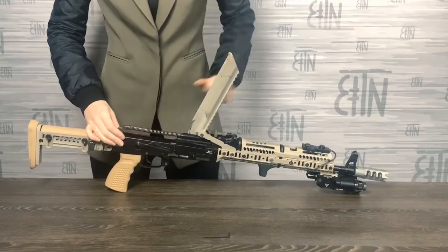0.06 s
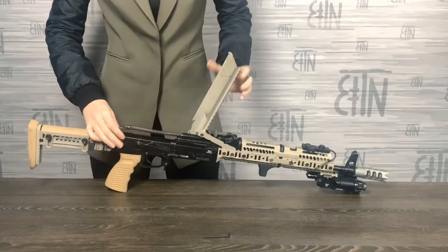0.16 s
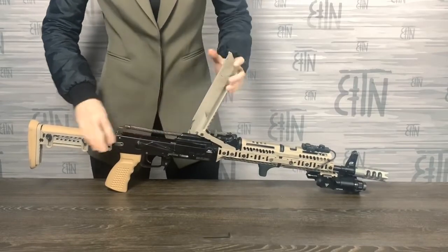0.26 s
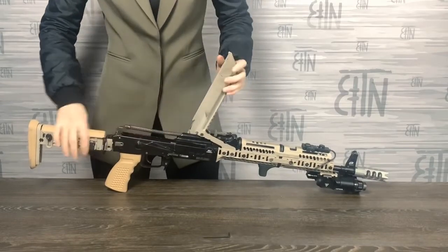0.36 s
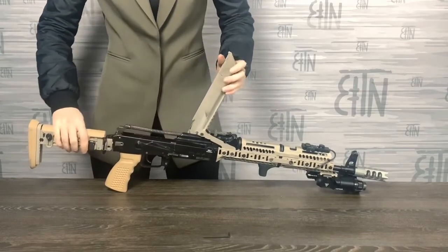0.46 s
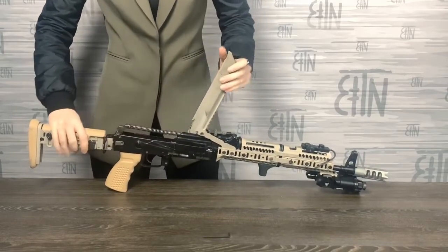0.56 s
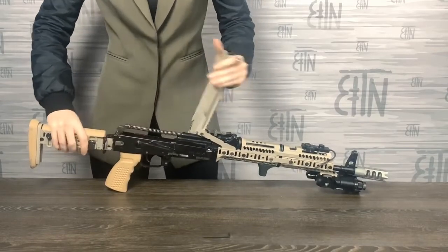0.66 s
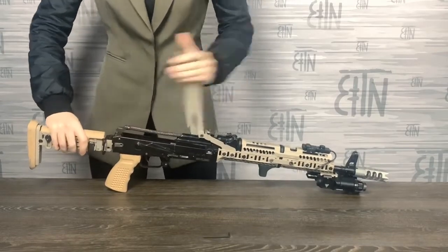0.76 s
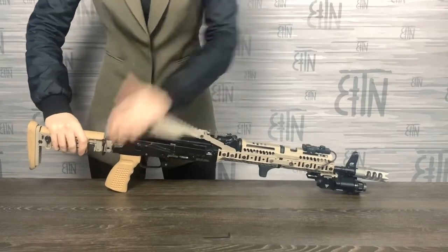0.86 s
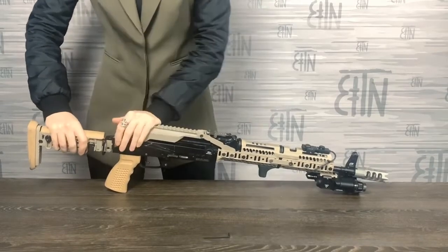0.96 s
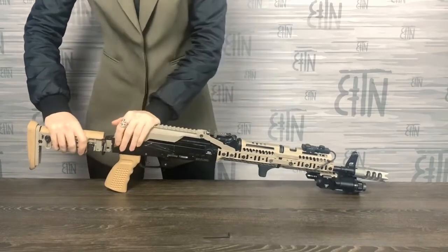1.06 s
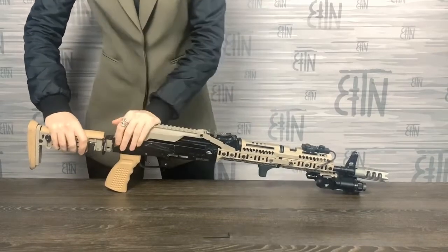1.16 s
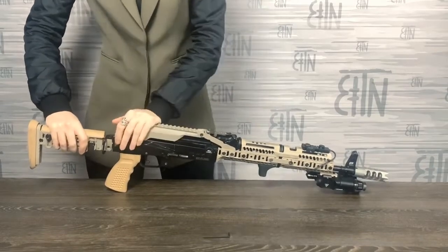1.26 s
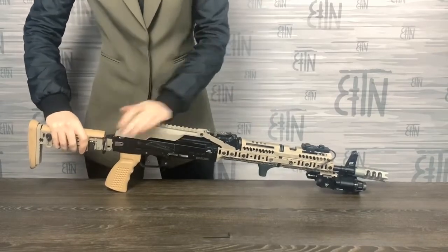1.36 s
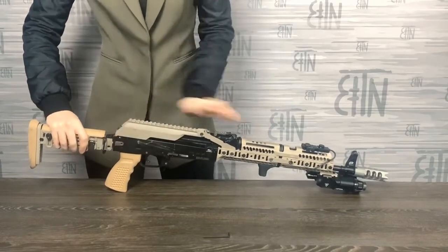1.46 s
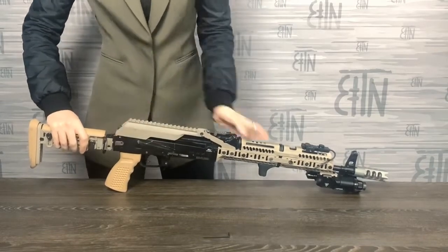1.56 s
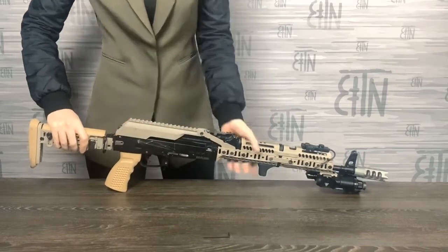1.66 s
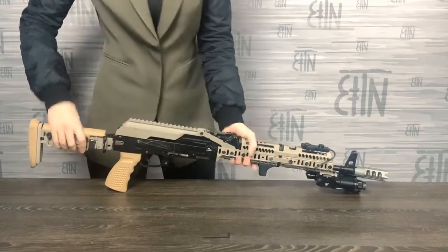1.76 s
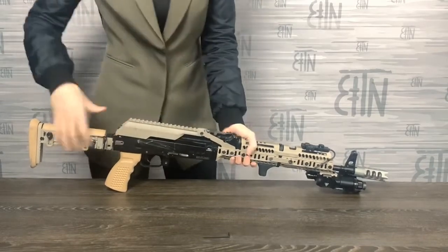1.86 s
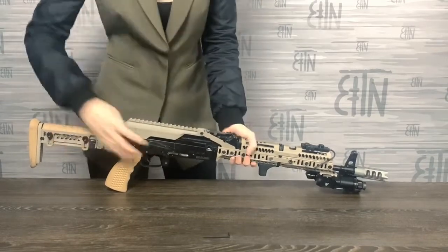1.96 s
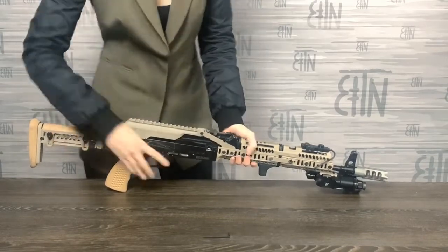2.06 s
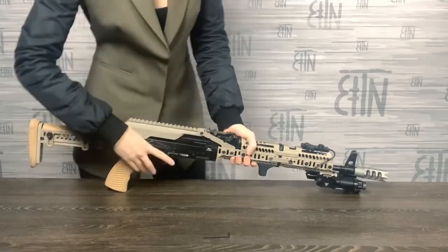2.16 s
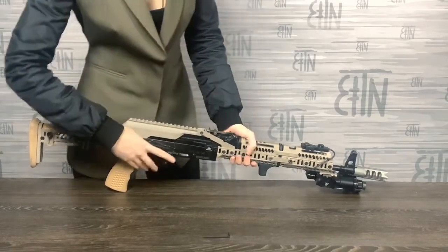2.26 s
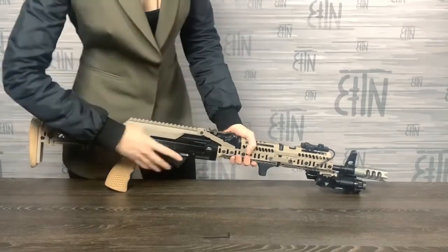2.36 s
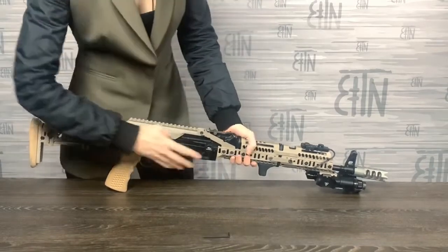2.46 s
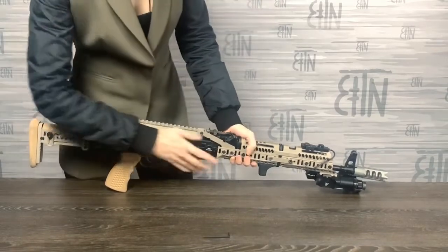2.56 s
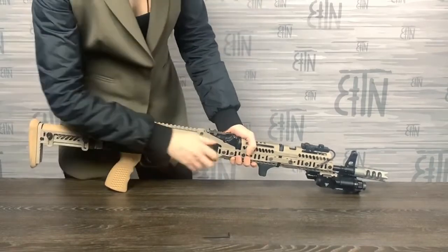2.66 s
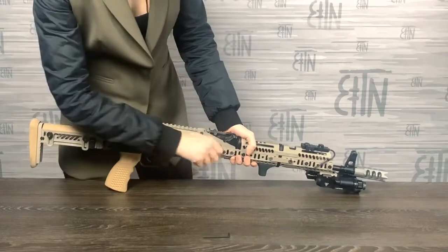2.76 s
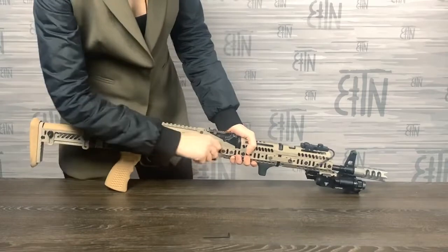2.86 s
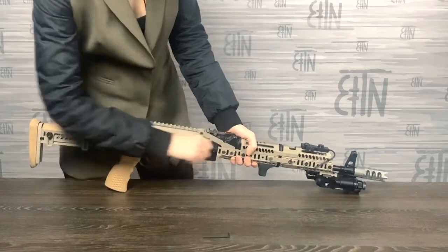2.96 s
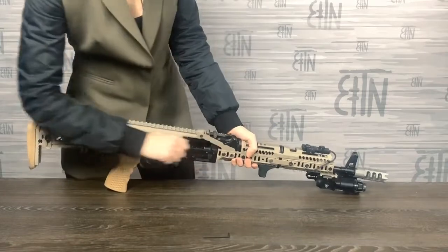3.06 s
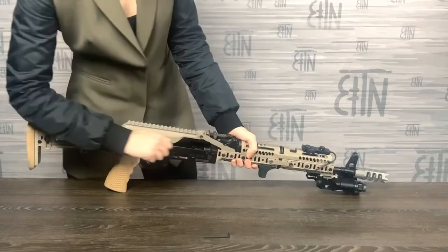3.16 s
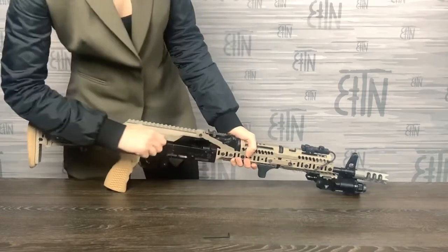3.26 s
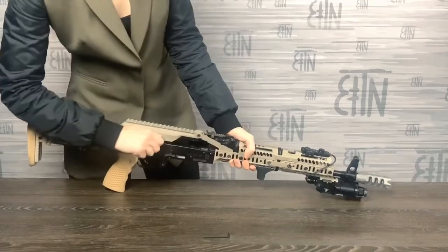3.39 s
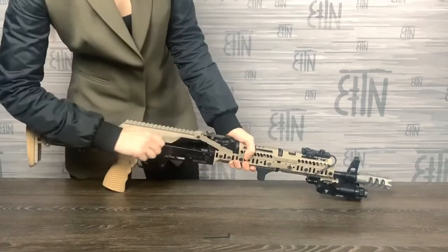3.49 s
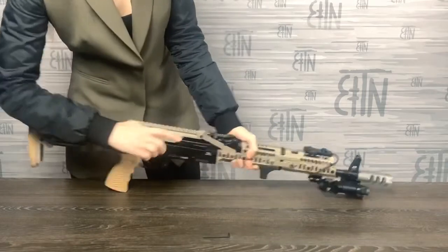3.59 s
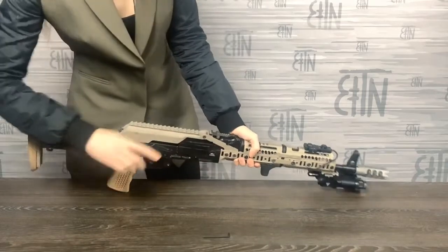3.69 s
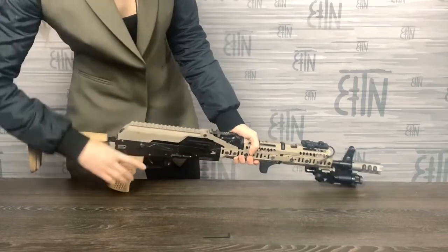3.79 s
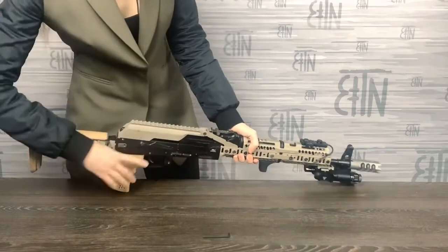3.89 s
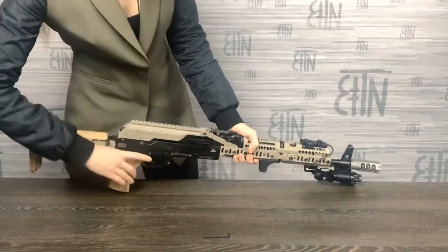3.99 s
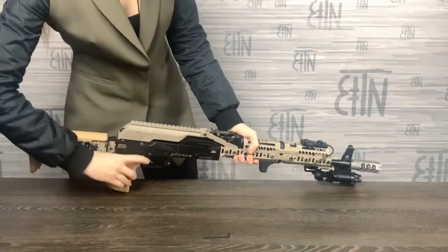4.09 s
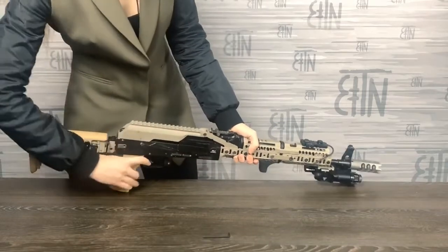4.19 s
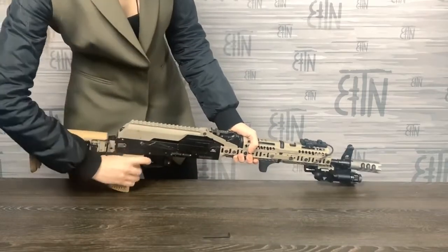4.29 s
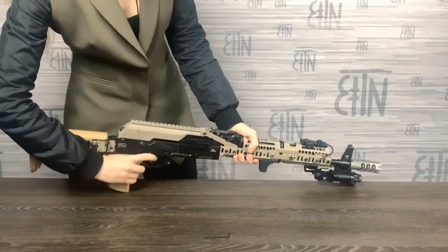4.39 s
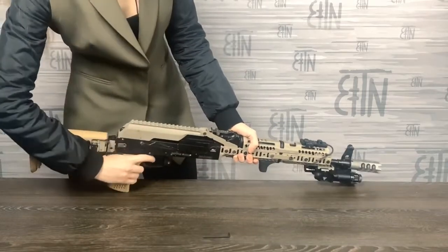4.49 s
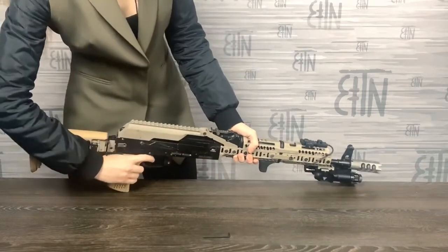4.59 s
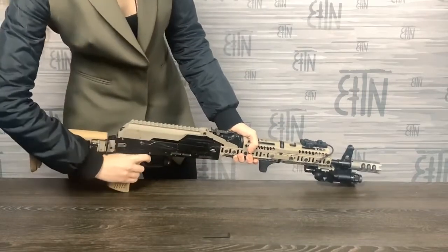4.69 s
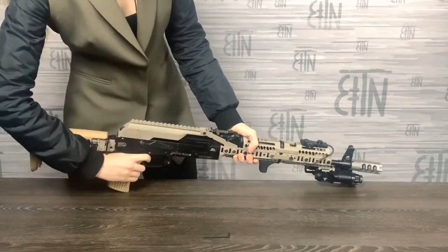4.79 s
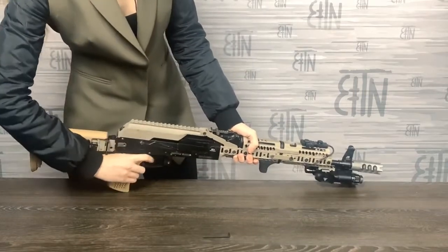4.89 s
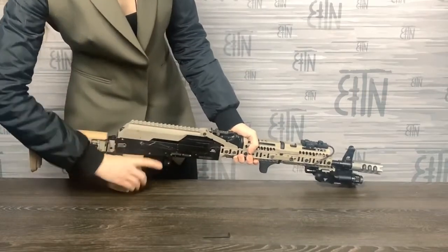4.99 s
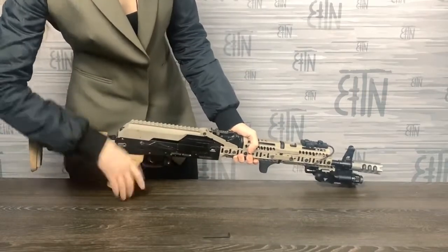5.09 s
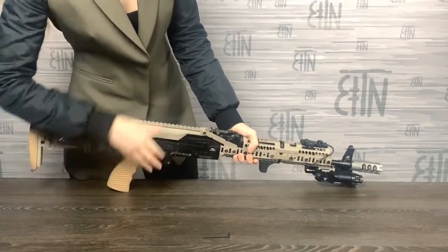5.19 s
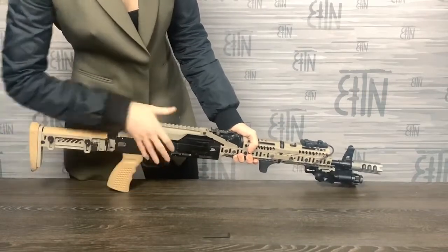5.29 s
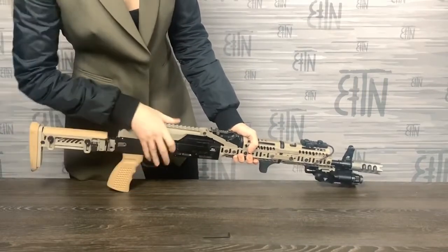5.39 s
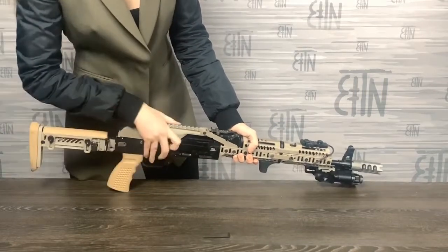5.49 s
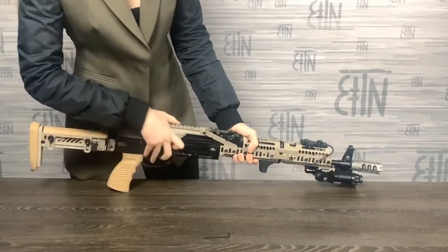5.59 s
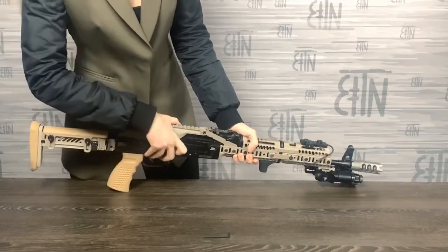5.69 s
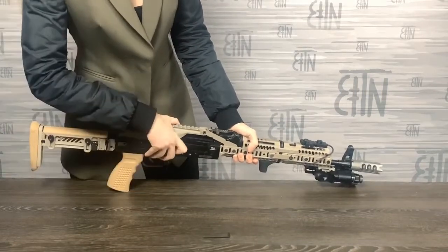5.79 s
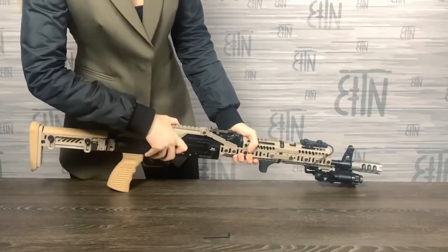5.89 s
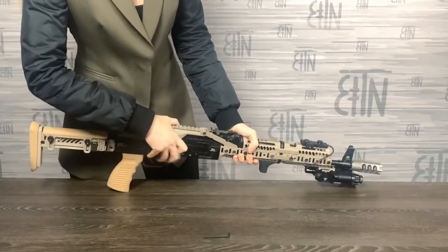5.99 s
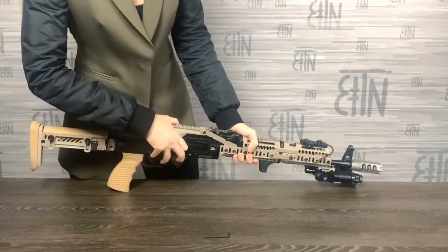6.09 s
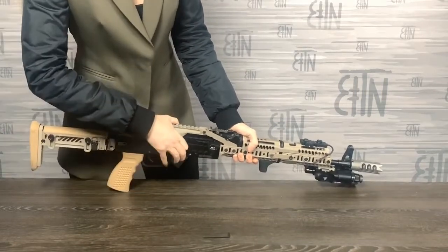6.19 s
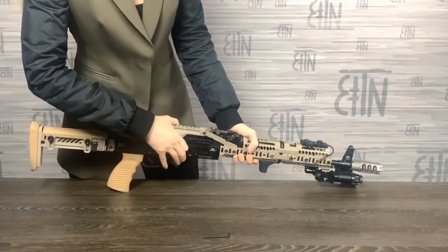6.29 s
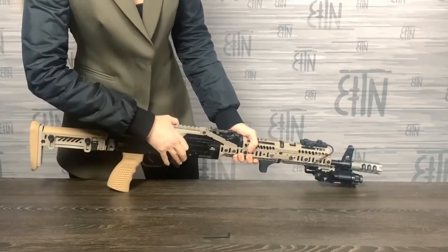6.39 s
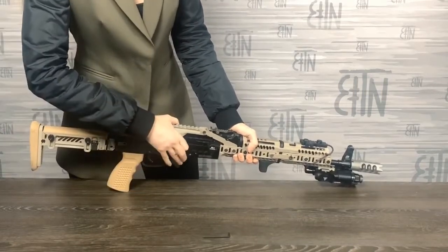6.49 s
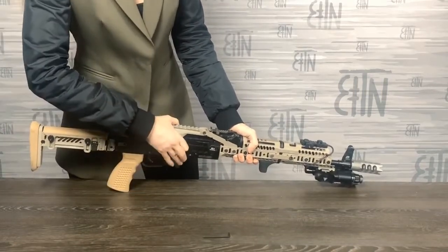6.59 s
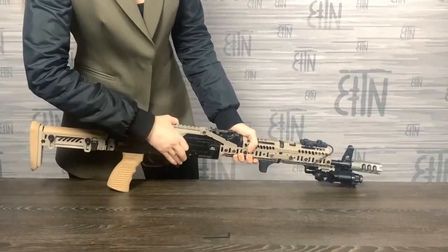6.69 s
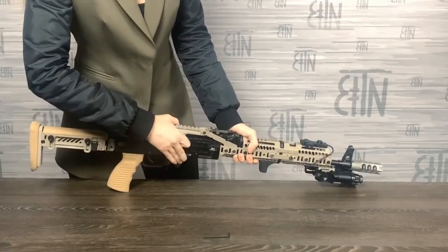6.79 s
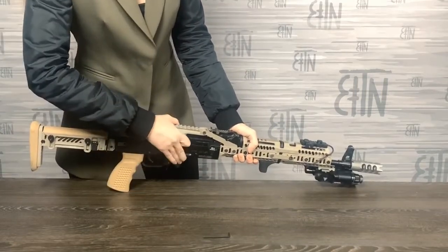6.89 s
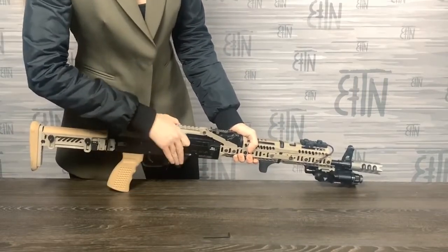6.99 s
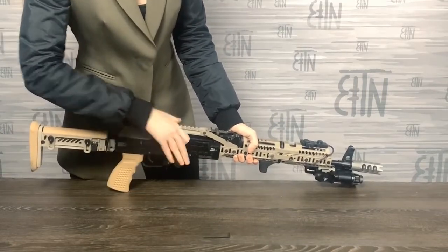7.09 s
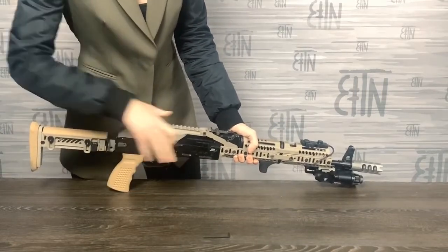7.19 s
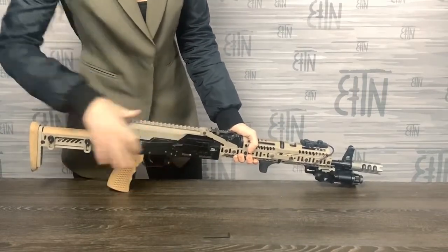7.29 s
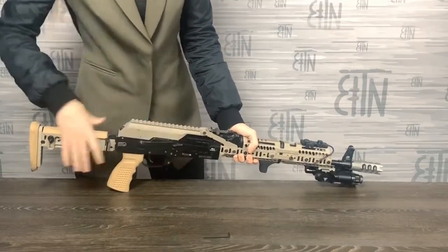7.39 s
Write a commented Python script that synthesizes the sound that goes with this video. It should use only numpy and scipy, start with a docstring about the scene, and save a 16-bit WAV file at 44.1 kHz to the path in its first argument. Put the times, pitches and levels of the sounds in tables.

```python
"""A bare room, where a rifle is put together on a wooden table: the recoil spring is seated, the dust
cover slammed shut, the bolt carrier drawn back and let fly, the hammer dropped, the safety snapped on.
Each blow is a burst of tiny contacts that rings its steel part, echoes off the walls and thumps the
table; sliding parts scrape by stick and slip. Sleeves brush over a low building rumble. The loudest
blows overload the microphone, and the sound cuts out briefly three times."""
import sys
import numpy as np
from scipy import signal
from scipy.fft import rfft, irfft
from scipy.io import wavfile

SR = 44100
rng = np.random.default_rng(int(sys.argv[2]) if len(sys.argv) > 2 else 0)


def int16_out(signal):
    """Quantize to a 16-bit WAV file."""
    q = np.round(np.clip(np.atleast_2d(signal).T, -1, 1) * 32767)
    wavfile.write(sys.argv[1], SR, q.astype(np.int16))


N = 328545

# each steel part's clack, the spectrum of its crowd of short modes: pitch_hz, relative_db
CLACK_COLOURS = { "spring": [(290, -62), (500, -29), (1420, -31), (2060, -2), (2600, -18), (3100, -13),
                 (3280, -27.5), (8170, -23), (15900, -54.5)], "rail": [(410, -37.5), (700, -12),
                 (1660, -12.5), (2020, -5.5), (3060, -3), (3400, -1.5), (4900, -4.5), (7750, -4),
                 (15900, -23)], "cover": [(82, -46), (140, -14), (328, -11.5), (369, -4.5), (416, -16),
                 (459, -9.5), (815, -13), (918, -6.5), (1730, -5), (2150, -3.5), (2730, -6.5), (2900, -8.5),
                 (6650, -13), (15900, -24.5)], "catch": [(82, -38.5), (140, -4), (239, -8.5), (450, 1),
                 (815, -18), (994, -6.5), (1630, -1.5), (2730, -9.5), (3460, -3.5), (3970, -16), (4840, -9),
                 (7490, -13.5), (12500, -22), (15900, -28.5)], "latch": [(80, -34), (150, -9.5),
                 (390, -4.5), (780, -14), (1100, -5), (2100, -4.5), (4000, -8), (4850, -2), (6600, -12.5),
                 (9100, -13), (15900, -27.5)], "guide": [(120, -47.5), (200, -17.5), (849, -13.5),
                 (1550, -5.5), (1970, -7), (2240, 1.5), (2950, -18), (3540, -5.5), (3950, -11.5),
                 (5700, -8), (6720, -12.5), (14000, -19), (15900, -30.5)], "hammer face": [(120, -45),
                 (200, -16), (775, -17), (1100, -8.5), (1730, -20), (2120, -10), (3880, -14.5), (5400, -7),
                 (11000, -22.5), (12800, -5.5), (15900, -54.5)], "carrier": [(80, -30), (170, -5.5),
                 (400, -6), (650, -5), (880, -1), (1050, -6.5), (1300, -13.5), (1700, -1), (2250, -1),
                 (2550, -7), (3200, -4.5), (5400, -7.5), (9000, -11.5), (12500, -13.5), (15900, -24)],
                 "hammer": [(90, -30.5), (200, -8.5), (340, -1), (560, -8), (750, -10.5), (1030, -12),
                 (1400, -13), (1800, -5), (2650, -14), (5200, -8.5), (8000, -12.5), (11300, -16.5),
                 (12500, -7), (15900, -30.5)], "safety": [(80, -15.5), (140, -7), (200, -7), (330, -12),
                 (580, -9), (950, -4), (1250, -7.5), (2000, -7), (2670, -4), (3700, -6.5), (6000, -12),
                 (9000, -14), (15900, -23.5)], "frame": [(120, -25.5), (250, -8), (700, -8), (1000, -5),
                 (1270, -10), (2100, -5.5), (2550, -14), (4200, -15.5), (6900, -23.5), (14000, -40)]}
# a part hits its stop: start_s, level_db, chatter_ms, touch_ahead_ms, rebound_loss_db, jolt_db, part
SLAMS = [(.881, 6.5, 12, 0, 5, -20.5, "cover"), (3.2146, 1.5, 3, 0, 19, -29.5, "catch"),
         (3.594, 8, 11, 0, 8.5, -19, "carrier"), (4.6867, 3.5, 5.5, 7, 13, -24, "hammer"),
         (6.7966, 2.5, 3.3, 4, 16.5, -23, "safety")]
# the moving carrier judders: last_tick_s, last_level_db, chatter_ms, spacing_ms, growth_db, part
JUDDERS = [(2.958, -14.5, 5.5, 14, 0, "hammer face"), (3.006, -13.5, 2.6, 9.6, 0, "latch"),
           (3.071, -9, 3.6, 11.2, 3.3, "guide"), (3.1428, -11, 3.5, 9.5, 5.5, "guide"),
           (3.577, 2.5, 9.2, 12, 2.5, "carrier")]
# single clicks: start_s, level_db, chatter_ms, part
CLICKS = [(.2661, -24, 2.4, "spring"), (.383, -31.5, 2.6, "frame"), (.748, -32.5, 4.5, "rail"),
          (1.741, -35.5, 2.5, "rail"), (2.8334, -15.5, 3.2, "latch"), (2.8605, -17, 3.8, "latch"),
          (3.509, -17.5, 4.5, "latch"), (4.924, -21.5, 3.6, "latch"), (5.518, -42, 11, "frame"),
          (5.715, -43, 6.6, "frame"), (5.792, -41.5, 3.04, "frame"), (6.014, -53, 9, "rail"),
          (6.146, -52, 7, "frame")]


def undb(db):
    """Decibels to gain."""
    return 10 ** (np.asarray(db) / 20)


def unit(x):
    """Scale a response to energy one."""
    return x / np.sqrt(np.sum(x ** 2))


def add(track, start_s, sound):
    """Mix a sound into the track from a given time."""
    i = max(int(start_s * SR), 0)
    track[i:i + len(sound)] += sound[:max(N - i, 0)]


def through(sound, response):
    """Pass a sound through a response."""
    return signal.fftconvolve(sound, response)[:N]


def on_log(hz, points):
    """Read (pitch_hz, value) points on a log-frequency axis."""
    pitch_hz, value = np.transpose(points)
    return np.interp(np.log(np.maximum(hz, 1)), np.log(pitch_hz), value)


def colour(points, size=4096):
    """An EQ curve of (pitch_hz, relative_db) points as a minimum-phase response of energy one."""
    curve_db = on_log(np.fft.rfftfreq(size, 1 / SR), points)
    cepstrum = irfft(np.log(undb(curve_db)))
    cepstrum[1:size // 2] *= 2
    cepstrum[size // 2 + 1:] = 0
    return unit(irfft(np.exp(rfft(cepstrum))))


def ring(modes, t60_factor=1):
    """Struck modes ring as decaying sines; each t60 is capped at 2 s, then scaled."""
    t = np.arange(2 * SR) / SR
    return sum(undb(db - 60 * t / (min(t60_s, 2) * t60_factor)) * np.sin(2 * np.pi * hz * t)
               for hz, db, t60_s in modes)


def air(level_db=-52.5):
    """Room tone: low building rumble under a faint hiss."""
    # spectrum of the still air: pitch_hz, relative_db
    spectrum = [(12, -26.5), (20, 5.5), (36, 0.5), (55, -15.5), (93, 0), (203, -32), (240, -24),
                (318, -26.5), (432, -26), (470, -32.5), (526, -27.5), (1000, -36), (1750, -37), (8130, -45),
                (15900, -51.5)]
    bed = signal.fftconvolve(rng.standard_normal(N + SR), colour(spectrum, size=16384))
    return undb(level_db) * bed[SR:SR + N]


def room(level_db=-3.5, first_echo_s=.0041, build_s=.0028):
    """The dense reverb tail from bare walls, its treble dying first."""
    # reverb time: pitch_hz, t60_s
    decay_times = [(100, .62), (400, .5), (1000, .49), (2500, .51), (5000, .46), (8000, .37), (12000, .29),
                   (16000, .2)]
    hz, t, cells = signal.stft(rng.standard_normal(SR), SR, nperseg=256)
    decay = undb(-60 * t / on_log(hz, decay_times)[:, None])
    _, tail = signal.istft(cells * decay, SR)
    build_up = np.clip((np.arange(len(tail)) / SR - first_echo_s) / build_s, 0, 1)
    return undb(level_db) * unit(tail * build_up)


def sleeves(flutter_db=1.8, creases_per_s=20):
    """Jacket sleeves brush unevenly, louder as an arm speeds up and softer as it comes to rest."""
    # spectrum of the rubbing cloth: pitch_hz, relative_db
    cloth = [(88, -34.5), (150, -1), (300, -1.5), (337, -6), (416, -1.5), (545, -8), (687, -7.5),
             (3340, -15.5), (15000, -32)]
    # arm movements: fastest_s, length_s, level_db
    reaches = [(0.047, 1.2, -60.5), (0.551, 0.76, -63), (1.572, 0.92, -55), (2.251, 1.45, -60),
               (3.851, 0.93, -50.5), (4.399, 0.65, -62.5), (5.4, 1.23, -58.5), (6.219, 0.62, -64),
               (7.36, .7, -57)]
    t = np.arange(N) / SR
    speed = sum(undb(db) * np.cos(np.pi * np.clip((t - fastest_s) / length_s, -.5, .5)) ** 2
                for fastest_s, length_s, db in reaches)
    creases = np.arange(0, N / SR, 1 / creases_per_s)
    flutter = undb(flutter_db * np.interp(t, creases, rng.standard_normal(len(creases))))
    return speed * flutter * through(rng.standard_normal(N), colour(cloth))


def table_top(sway_db=-8.5, click_to_jolt_db=-29):
    """The grip passes each knock to the table top, which booms and sways."""
    # the wood's boom and the deeper sway of the top: pitch_hz, relative_db, t60_s
    boom_modes = [(85.05, -1, .75), (110, -1, 0.67), (133.8, -7, 0.45)]
    sway_modes = [(45.4, -3, 2.3), (28.8, -5, .7), (57.6, -6.5, 2.4)]
    thump = ring(boom_modes) + undb(sway_db) * ring(sway_modes)
    thumps = np.zeros(N)
    for at, *_, jolt_db, part in SLAMS:
        add(thumps, at, undb(jolt_db) * thump)
    for at, db, *_ in CLICKS + JUDDERS:
        add(thumps, at, undb(db + click_to_jolt_db) * thump)
    return thumps


def cocked_spring(pitch_hz=3456, base_db=-72, swell_db=5, start_s=4.12, end_s=4.685):
    """A spring sings faintly while the trigger is pressed, until the hammer falls."""
    t = np.arange(N) / SR
    pressure = np.clip((t - start_s) / (end_s - start_s), 0, 1)
    gate = np.minimum(10 * pressure, 1) * (t < end_s)
    return undb(base_db + swell_db * pressure) * gate * np.sin(2 * np.pi * pitch_hz * t)


def slide(length_s, grit_db=3.5, grain_samples=128):
    """Stick and slip: a scrape of unevenly loud noise grains that fades in and out."""
    n = max(int(length_s * SR), SR // 100)
    grain_db = grit_db * np.clip(rng.standard_normal(N // grain_samples), -2, 2)
    grains = np.repeat(undb(grain_db), grain_samples)[:n]
    grains /= np.sqrt(np.mean(grains ** 2))
    return rng.standard_normal(n) * grains * signal.windows.tukey(n, .5)


def chatter(decay_ms):
    """Steel meets steel in a burst of tiny contacts; each spot hit has a slightly different colour."""
    t = np.arange(SR // 8) / SR
    burst = rng.standard_normal(len(t)) * np.exp(-1000 * t / decay_ms)
    hz = np.arange(400, 16000, 450)
    spot_db = np.minimum(hz / 2500, 1) * rng.uniform(-3, 3, len(hz))
    return np.convolve(burst, colour(np.column_stack([hz, spot_db]), size=512))


def fumbles(count=6, span_s=(5.3, 6.5), level_db=-55.5, chatter_ms=4):
    """Faint ticks at chance moments as fingers feel over the frame for the safety lever."""
    times = np.interp(np.arange(count) + rng.random(count), [0, count], span_s)
    return [(at, level_db, chatter_ms, "frame") for at in times]


def judders(ticks=3):
    """The carrier catches and breaks free in evenly spaced ticks, level or growing."""
    return [(at - k * spacing_ms / 1000, db - k * growth_db, chatter_ms, part)
            for at, db, chatter_ms, spacing_ms, growth_db, part in JUDDERS for k in range(ticks)]


def slams(rebounds=4, rebound_s=.014, scatter=.25, touch_db=-18.5):
    """A part hits its stop and rebounds ever more softly; some touch lightly just before the blow."""
    blows = []
    for at, db, chatter_ms, ahead_ms, loss_db, _, part in SLAMS:
        if ahead_ms > 1:
            blows.append((at - ahead_ms / 1000, db + touch_db, chatter_ms, part))
        blows.append((at, db, chatter_ms, part))
        for k in range(1, rebounds + 1):
            delay_s = (k + scatter * rng.uniform(-1, 1)) * rebound_s
            blows.append((at + delay_s, db - k * loss_db, chatter_ms, part))
    return blows


def steel(part, blows, tail):
    """Blows and scrapes make one steel part clack, echo in the room and ring on briefly."""
    # sliding contacts: start_s, end_s, level_db, part
    scrapes = [(.47, .67, -60.5, "rail"), (.66, .85, -58, "rail"), (.76, .89, -48.5, "rail"),
               (1.995, 2.085, -54, "frame"), (2.642, 2.73, -58.5, "rail"), (2.942, 3.19, -38, "guide"),
               (3.24, 3.52, -48, "frame"), (3.522, 3.585, -23.5, "carrier"), (4.278, 4.378, -65.5, "rail")]
    # each part's lasting modes: pitch_hz, relative_db, base_t60_s
    ring_modes = { "spring": [(2098, -1.5, 0.49), (2320, -11.5, 0.37), (3029, -0.5, .5), (4570, -19, .2),
                  (6950, -22, 0.16), (8290, -12, 0.13)], "rail": [(2089, -5, .4), (3036, -4.5, .4),
                  (3470, 1.5, .2), (3990, -4, .2), (4330, -3.5, 0.25), (4900, -1.5, .15), (5340, -2, .15),
                  (6150, -4, .15), (6560, -1.5, .2), (7350, 3, .2), (8290, -2.5, 0.13), (9900, -6.5, .15),
                  (11500, -6, .15), (12870, -3.5, .2)], "cover": [(1375, -3, .35), (1520, -8, .3),
                  (1790, -7, 0.27), (1907, -4, .4), (2013, 2.5, .45), (2050, -4, .4), (2118, -2, 0.35),
                  (2205, -0.5, .5), (2697, 1, 0.64), (2976, -3.5, 0.44), (3050, -10, .4), (3740, -9, .35),
                  (4830, -7, .35)], "catch": [(396, -4, 0.28), (440, 0.5, 0.68), (1474, -10.5, .3),
                  (1617, -3.5, .33), (2160, -7.5, 0.5), (3300, -8.5, 0.85), (4464, -6.5, .15),
                  (5050, -5, .15), (6080, -8, .1), (9400, -9.5, .1), (12370, -6.5, .12)],
                  "latch": [(4250, -2.5, .3), (4200, -3, .3), (4560, -2, .15), (4900, 1.5, .2),
                  (6850, -5.5, .25), (10900, -9.5, 0.099)], "guide": [(1346, -6.5, 0.045), (2115, 2, 0.04),
                  (3588, -3, 0.054), (4610, -19.5, 0.053), (8695, -2.5, 0.064), (12500, -18.5, .06)],
                  "hammer face": [(12550, 5, 0.18), (12500, -6, .1), (5430, -18, .08),
                  (6830, -18.5, 0.059)], "carrier": [(194, -7, 0.55), (333, -6.5, 0.52), (560, -3, .35),
                  (790, -1.5, 0.26), (905, -3.5, 0.19), (954.7, 1.5, 0.48), (1124, -6, 0.85),
                  (1663, -2, .4), (1935, -2.5, 0.43), (2200, 0.5, 0.48), (2270, 1.5, .45), (2790, -8.5, .5),
                  (3340, -4.5, .45), (3220, -2, .45), (4930, 0, 0.32), (5440, -7, 0.19), (12420, -5, .18)],
                  "hammer": [(279, -12.5, 0.34), (336, -9, 0.33), (386, -4, .3), (560, -6, 0.2),
                  (1041, -10, 0.34), (1875, -5, .25), (2280, -8, .5), (3386, -12.5, .4), (5142, -5, .21),
                  (5800, -5, .18), (9430, 2, 0.15), (12430, -0.5, .2), (12700, -1, .2)],
                  "safety": [(958, -5, 0.58), (1010, -23, 0.5), (2020, -9, 0.28), (2670, -7.5, 0.49),
                  (2790, 0, .5), (4120, -1.5, .13), (4955, -11, 0.24), (7320, 1, 0.24), (9028, 0, 0.24)],
                  "frame": [(1050, 0, .15), (1600, -4, .2), (2170, 2, 0.19), (3700, -11, .2),
                  (4350, -6, 0.3)]}
    # each part's mix and ring length: ring_db, t60_factor, reverb_send_db
    part_mix = {"spring": (4, .95, -3), "rail": (-2, .7, -3), "cover": (-7, .9, -2), "catch": (-10, .6, -4),
                "latch": (-8, .7, -4), "guide": (-6, .7, -5), "hammer face": (2, .7, -4),
                "carrier": (-11, .8, -1), "hammer": (-8, .85, 0), "safety": (-12, .9, -1),
                "frame": (-10, .9, -3)}
    contact, push = np.zeros(N), np.zeros(N)
    for at, db, chatter_ms, struck in blows:
        if struck == part:
            burst = undb(db) * chatter(chatter_ms)
            add(contact, at, burst)
            # the lasting modes take the blow as one impulse, a quarter of the chatter time later
            add(push, at + chatter_ms / 4000, np.array([np.linalg.norm(burst)]))
    for start_s, end_s, db, rubbed in scrapes:
        if rubbed == part:
            scrape = undb(db) * slide(end_s - start_s)
            add(contact, start_s, scrape)
            add(push, start_s, scrape)
    ring_db, t60_factor, send_db = part_mix[part]
    # the walls hear the blow from all sides, which evens out its colour
    echo = undb(send_db) * through((push + contact) / np.sqrt(2), tail)
    clack = through(contact + echo, colour(CLACK_COLOURS[part]))
    ringing = through(push, unit(ring(ring_modes[part], t60_factor)))
    return clack + undb(ring_db) * ringing


def scene():
    """The rifle in the room, over the table, the sleeves and the air, in mono."""
    tail = room()
    blows = slams() + judders() + CLICKS + fumbles()
    rifle = sum(steel(part, blows, tail) for part in CLACK_COLOURS)
    return (rifle + table_top() + cocked_spring() + sleeves() + air())[None]


def record(dry):
    """The loudest blows clip, the sound cuts out three times, and a steep low-pass trims the top."""
    # brief dropouts: start_s, end_s, depth_db, fade_back_s
    dropouts = [(1.033, 1.106, -60, .04), (1.346, 1.41, -35, .025), (3.5872, 3.5942, -27, .0005)]
    ceiling, cutoff_hz = .88, 15900
    t = np.arange(N) / SR
    gain = np.ones(N)
    for start_s, end_s, depth_db, fade_back_s in dropouts:
        floor = undb(depth_db)
        gain *= np.interp(t, [start_s - .0005, start_s, end_s, end_s + fade_back_s], [1, floor, floor, 1])
    clipped = np.clip(dry, -ceiling, ceiling)
    low_pass = signal.ellip(10, .1, 90, cutoff_hz, fs=SR, output="sos")
    return signal.sosfilt(low_pass, clipped * gain)


dry = scene()
out = record(dry)
int16_out(out)
```